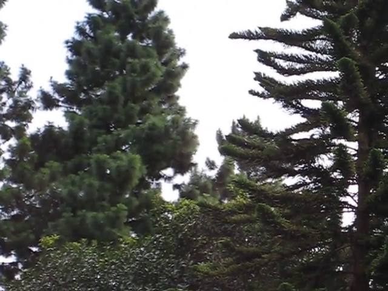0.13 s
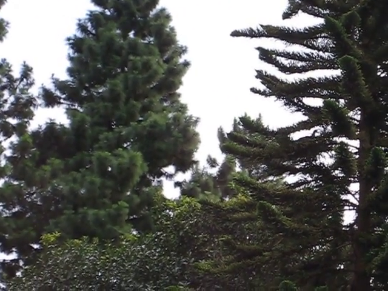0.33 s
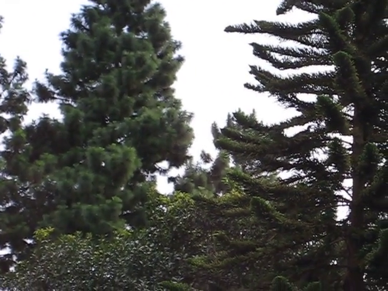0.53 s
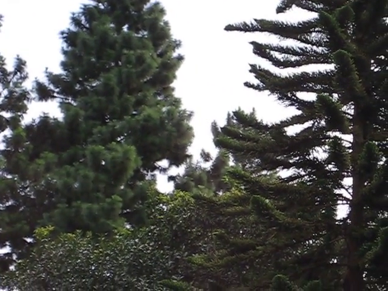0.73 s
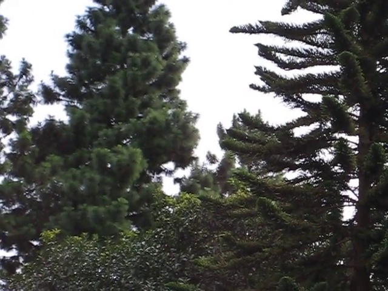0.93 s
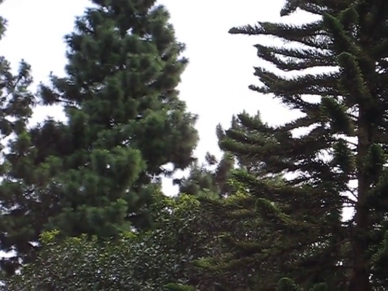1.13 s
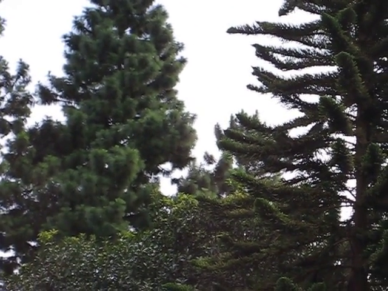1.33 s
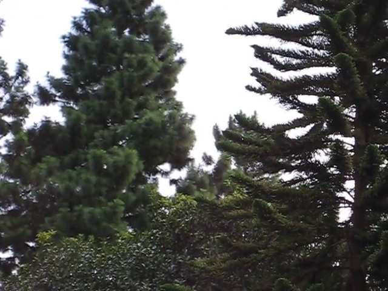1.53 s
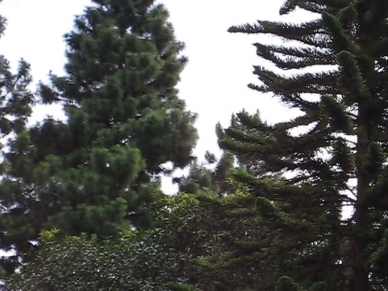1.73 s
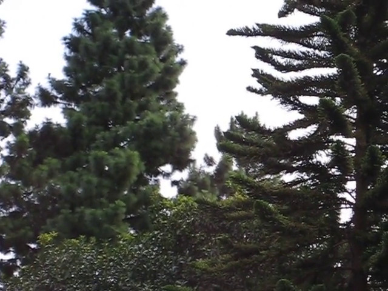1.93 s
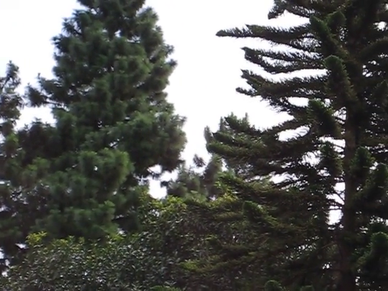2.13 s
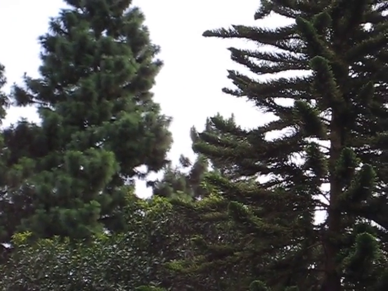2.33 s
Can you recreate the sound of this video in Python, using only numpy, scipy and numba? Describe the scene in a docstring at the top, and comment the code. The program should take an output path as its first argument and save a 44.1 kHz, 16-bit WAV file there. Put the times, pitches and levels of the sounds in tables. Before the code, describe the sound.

Three harsh upward bird calls ring out close by, with fainter chirps and whistles around them.

```python
"""Among tall trees at dawn, one microphone. First a far bird gives one rising call; then, close by, one
of its kind gives three loud calls that climb in pitch steps and collapse into a short creak. Small
birds whistle and rasp. Trunks and crowns scatter every voice over a distant hush of air and leaves.
Behind the microphone, the camera's gain control ducks the hush under the loud calls."""
import sys
import numpy as np
from scipy import signal
from scipy.fft import rfft, irfft
from scipy.io import wavfile
from scipy.ndimage import uniform_filter1d
from numba import njit

SR = 44100
rng = np.random.default_rng(int(sys.argv[2]) if len(sys.argv) > 2 else 0)


def store_wav(level_fs):
    """Save 16-bit WAV to argv[1]."""
    pcm = np.round(np.clip(np.atleast_2d(level_fs), -1, 1) * 32767)
    wavfile.write(sys.argv[1], SR, pcm.T.astype(np.int16))


N = 110250

# Three calls close to the microphone, one farther off. Each row: time in seconds, pitch in Hz,
# 2nd harmonic in dB, then the fundamental and the 4th harmonic (before the beak's lift) in dB over it.
NEAR_CALL_1 = [(0.21, 900, -46, -8, -10), (0.218, 1052, -44, 3.5, -8), (0.227, 1110, -33, 0.5, -19),
               (0.232, 1332, -22.5, -18, -40), (0.24, 1521, -23.5, 0, -38),
               (0.253, 1597, -14.5, -12.5, -33), (0.257, 1855, -23.5, -13, -22),
               (0.262, 1922, -31.5, 13.5, -7), (0.271, 1972, -27.5, 5.5, -8), (0.28, 2000, -18, -0.5, -8.5),
               (0.285, 2304, -32.5, 17, -15), (0.294, 2360, -28, 18, -7), (0.306, 2395, -21.5, 5, -14),
               (0.311, 2698, -21.5, 13, -8), (0.319, 2765, -24, 9.5, -12), (0.323, 2948, -22, 11.5, -9),
               (0.331, 3180, -30.5, 11.5, -12.5), (0.336, 3304, -23, 13, -13.5), (0.34, 2980, -26, 12, -18),
               (0.345, 2028, -27, 12, -16)]
NEAR_CALL_2 = [(1.752, 914, -42, -6, -15), (1.76, 1084, -40, 0.5, -11), (1.77, 1146, -30, -5.5, -17),
               (1.777, 1403, -14, -20.5, -30), (1.786, 1586, -18.5, -12, -35),
               (1.795, 1605, -15, -5.5, -18), (1.8035, 1653, -14, -24, -21), (1.8065, 1956, -21.5, 4.5, -8),
               (1.816, 1980, -16.5, 1, -8), (1.827, 2010, -29, -1, -7), (1.831, 2301, -27, 11.5, -10),
               (1.846, 2378, -23, 13, -7), (1.85, 2567, -19, 4, -21), (1.861, 2724, -18.5, 7.5, -16),
               (1.864, 2993, -14, 6, -18), (1.87, 2977, -37, 1, -16), (1.873, 3277, -30, 13.5, -20),
               (1.881, 3256, -28.5, 10.5, -24), (1.886, 2753, -22, 8, -22), (1.891, 1820, -18, 3, -2)]
NEAR_CALL_3 = [(2.034, 1103, -32.5, -2.5, -11), (2.045, 1272, -37, -17, -15),
               (2.056, 1418, -34.5, 0.5, -12), (2.066, 1490, -34, -6.5, -19),
               (2.076, 1576, -25, -2.5, -15.5), (2.088, 1624, -20, -4.5, -13.5),
               (2.099, 1702, -23.5, 0, -13), (2.108, 1752, -18, -17, -11.5), (2.12, 1792, -18, -5, -22),
               (2.131, 1835, -22.5, -12, -7.5), (2.138, 1843, -28, 7, -9.5),
               (2.1435, 2016, -15.5, -19, -34), (2.1455, 2577, -27, 15, -12.5),
               (2.157, 2592, -30.5, 7.5, -19), (2.168, 2563, -27, 16, -20), (2.172, 2740, -25, 19, -14)]
FAR_CALL = [(0, 2003, -60, 18, -26), (.016, 2150, -60, 16, -21), (.02, 2320, -58, 13, -20),
            (.038, 2510, -55, 12, -28.5), (.042, 2820, -55, 13.4, -27.5), (.062, 2835, -53, 11, -35),
            (.076, 3250, -58, 11, -25)]
# Creaks ending the near calls. Each row: start and length in seconds, first pulse rate in Hz, level in dB.
CREAKS = [(0.345, 0.014, 1886, -17), (1.891, 0.014, 1620, -17.5), (2.173, 0.0159, 1518, -21.5)]
# The near bird's throat resonances. Each row: centre in Hz, width in Hz, relative level in dB.
THROAT_RESONANCES = [(920, 1900, -17), (2656, 1620, -1.5), (5660, 4000, -14.5), (9000, 7000, -33)]
# Small whistlers. Each row: start and length in seconds, first, middle and last pitch in Hz,
# level in dB, flutter in dB.
WHISTLES = [(.10, 0.088, 9400, 9440, 9100, -58, 2), (0.193, 0.081, 9130, 8720, 8500, -50.5, 1),
            (.435, .085, 7530, 7520, 7500, -47.5, 1), (.429, .027, 4950, 5150, 5300, -31, 2.5),
            (.545, 0.0175, 2110, 2470, 2994, -46, 1.5), (0.561, 0.021, 3000, 3370, 3550, -35, 2),
            (.532, 0.02, 3227, 3600, 4370, -45, 0.5), (.578, .018, 9400, 8300, 7400, -51, 1),
            (.619, .022, 9100, 8300, 6600, -48, 1), (1.972, .06, 4850, 4750, 4710, -45, 0),
            (.78, 0.04, 5450, 5380, 5300, -45, 1.5), (.793, .022, 4150, 4300, 4400, -47, 1),
            (.815, .075, 4400, 4270, 4200, -44, 1), (.82, .04, 3850, 3350, 3290, -39, 1.5),
            (.838, 0.045, 2270, 2130, 2200, -45, 1.5), (.832, .02, 5200, 5050, 4900, -49, 1),
            (.866, .012, 2500, 3300, 3600, -45, 1), (.879, .028, 3450, 2300, 1600, -37, .5),
            (.826, .03, 4100, 3800, 3600, -49, 1), (.842, 0.018, 7600, 8000, 8250, -52, 1.5),
            (.86, 0.065, 8100, 6950, 6350, -49, 1.5), (.905, .045, 5200, 5050, 4800, -48, 1.5),
            (.95, .085, 4750, 4680, 4620, -46, 1), (1.035, 0.15, 4600, 4490, 4500, -48.5, 2),
            (1.02, .155, 4480, 4260, 4240, -49, 1.5), (.952, 0.021, 5770, 5700, 5450, -53, 1),
            (1.107, 0.009, 5200, 6300, 7700, -53, 1), (1.342, 0.018, 5000, 5900, 6450, -50, 1),
            (1.36, .018, 4500, 5500, 6900, -52, 1.5), (1.34, 0.05, 9729, 9500, 9450, -56, 2),
            (1.432, 0.007, 7350, 5960, 4585, -50, 1), (1.472, 0.024, 7600, 6400, 5800, -53, 1),
            (1.497, .012, 6100, 5300, 4600, -50, 1), (1.463, .045, 7800, 7600, 7500, -55, 1.5),
            (2.29, .13, 3680, 3500, 3720, -49, 2), (2.416, .03, 3720, 3900, 4220, -51, 2),
            (2.442, .065, 4210, 4190, 4180, -49, 2), (2.4, 0.1, 6000, 5100, 4850, -55, 2)]
# Raspy chirps. Each row: start and fade time in seconds, centre and width in Hz, level in dB.
CHIRPS = [(.43, 0.059, 4770, 500, -32), (.42, 0.05, 8550, 2510, -38), (0.552, 0.023, 5070, 500, -37.5),
          (0.666, 0.045, 6700, 5000, -44.5), (0.721, 0.058, 6270, 6700, -39.5),
          (.83, 0.11, 3030, 2550, -37.5), (1.105, 0.029, 9000, 3960, -52)]
# Scatter from the trees. Each row: delay in seconds, relative level in dB.
TREE_ECHOES = [(.004, -8), (.012, -13), (.04, -18), (.1, -22), (.16, -27.5), (.3, -40), (.7, -52)]
# The distant hush. Each row: frequency in Hz, relative spectral density in dB.
HUSH_SPECTRUM = [(12, -32), (20, -9.5), (237, -6.5), (415, -7.5), (1110, -10), (2050, -12.5), (4300, -13.5),
                 (8000, -17.5), (11000, -20), (12700, -25.5), (14600, -16), (16400, -28.5)]
# Thin steady whines. Each row: pitch in Hz, level in dB.
WHINES = [(7558, -62.5), (15149, -76)]
# A brief low swell of the hush. Each row: start and fade time in seconds, centre and width in Hz,
# level in dB.
HUSH_SWELL = [(.36, 0.16, 342, 560, -47.5)]

WAVER_SHARE = 0.0026  # unsteadiness of pitch in calls and whistles


def undb(db):
    return 10 ** (np.asarray(db) / 20)


def walk(rate, size):
    """Smooth random drift that turns about rate times a second, spread near 1."""
    hold = max(int(SR / rate), 1)
    steps = np.repeat(rng.standard_normal(size // hold + 1), hold)
    return 1.62 * uniform_filter1d(uniform_filter1d(steps, hold), hold)[:size]


def span(start, length):
    """First sample and local times of an event."""
    return max(int(start * SR), 0), np.arange(max(int(length * SR), 8)) / SR


def edges(t, fade_s):
    return np.clip(np.minimum(t, t[-1] - t) / fade_s, 0, 1)


def add(out, i, x):
    out[i:i + len(x)] += x[:N - i]


def resonate(x, hz, width):
    """Two like resonances in series."""
    b, a = signal.iirpeak(hz, hz / width, SR)
    return signal.lfilter(b, a, signal.lfilter(b, a, x))


def call(rows, beak_hz=3030, beak_width_hz=450, beak_db=8.5):
    """A bird's harmonic voice steps upward; the beak lifts upper harmonics passing its resonance."""
    out, rows = np.zeros(N), np.array(rows, float)
    start = rows[0, 0]
    i, t = span(start, rows[-1, 0] - start)
    hz, db, first_db, fourth_db = (np.interp(t + start, rows[:, 0], column) for column in rows.T[1:])
    phase = 2 * np.pi * np.cumsum(hz * (1 + WAVER_SHARE * walk(238.4, len(t)))) / SR
    for k in range(1, 13):
        lift_db = (k > 2) * beak_db * np.exp(-((k * hz - beak_hz) / beak_width_hz) ** 2)
        harmonic_db = first_db if k == 1 else fourth_db * ((k - 2) / 2) ** 0.83 + lift_db
        grain_db = .8 * min(k - .5, 4) * (hz / 2200) ** 2 * walk(1200, len(t))  # rougher when higher
        top_fade = np.clip((SR / 2.5 - k * hz) / 1000, 0, 1)
        gain = undb(db + harmonic_db + grain_db) * top_fade * edges(t, fade_s=.002)
        add(out, i, np.sqrt(2) * gain * np.sin(k * phase + 2 * np.pi * rng.random()))
    return out


def creaks(end_hz=560, slowing_s=0.003, scatter_db=2.5, fade_s=0.012):
    """The near bird's voice slackens: slowing, uneven pulses ring the throat."""
    out = np.zeros(N)
    for start, length, hz, db in CREAKS:
        i, t = span(start, length)
        cycles = np.cumsum(end_hz + (hz - end_hz) * np.exp(-t / slowing_s)) / SR
        strength = undb(scatter_db * rng.standard_normal(100))[cycles.astype(int)]
        pulses = np.diff(np.floor(cycles), prepend=-1) * strength * np.exp(-t / fade_s)
        pulses = np.r_[pulses, np.zeros(400)]  # time to ring out
        ring = sum((-1) ** k * undb(peak_db) * resonate(pulses, centre, width)
                   for k, (centre, width, peak_db) in enumerate(THROAT_RESONANCES))
        add(out, i, ring * undb(db) / ring[:len(t)].std())
    return out


def whistles(flutter_per_s=119):
    """Small birds whistle almost pure tones that bend through three pitches and flutter in level."""
    out = np.zeros(N)
    for start, length, *pitches, db, flutter_db in WHISTLES:
        i, t = span(start, length)
        bend_hz = np.polyval(np.polyfit([0, .5, 1], pitches, 2), t / length)
        hz = bend_hz * (1 + WAVER_SHARE * walk(flutter_per_s, len(t)))
        flutter = walk(flutter_per_s, len(t)) + 1.1 * walk(600, len(t))
        gain = undb(db + flutter_db * flutter) * edges(t, 0.04 * length)
        add(out, i, np.sqrt(2) * gain * np.sin(2 * np.pi * np.cumsum(hz) / SR))
    return out


def two_voiced_note(upper_db=-30, lower_db=-41, decay_s=.075):
    """Both sides of one bird's voice box glide down; faint overtones and their sum tone follow."""
    def glide(from_hz, to_hz, glide_s):
        return 2 * np.pi * np.cumsum(to_hz + (from_hz - to_hz) * np.exp(-t / glide_s)) / SR

    out = np.zeros(N)
    i, t = span(start=1.134, length=0.148)
    upper, lower = glide(8800, 6070, .04), glide(7550, 5250, .062)
    overtones = undb(-22) * t / decay_s * (np.sin(2 * upper) + np.sin(upper + lower) + np.sin(2 * lower))
    voices = undb(upper_db) * (np.sin(upper) + overtones) + undb(lower_db) * np.sin(lower)
    envelope = edges(t, fade_s=.025) * np.exp(-t / decay_s)
    grain = undb(1.3 * walk(600, len(t)))
    add(out, i, np.sqrt(2) * voices * envelope * grain)
    return out


def rasps(rows):
    """Grainy bursts of noise, quick to start, then fading: chirps when high, a soft swell when low."""
    out = np.zeros(N)
    for start, fade_s, hz, width, db in rows:
        i, t = span(start, 2 * fade_s)
        grainy_noise = rng.standard_normal(len(t)) * undb(walk(460, len(t)))
        burst = resonate(grainy_noise, hz, width)
        envelope = edges(t, 0.073 * fade_s) * np.exp(-(t / fade_s) ** 3)
        add(out, i, burst / burst.std() * undb(db) * envelope)
    return out


def air(x, from_hz=9500, db_per_khz=-3):
    """The air dulls the top on the way to the microphone."""
    hz = np.arange(N // 2 + 1) * SR / N
    return irfft(rfft(x) * undb(db_per_khz * np.maximum(hz - from_hz, 0) / 1000), N)


def trees(x, low_cut_hz=1080, treble_hz=5000, treble_db=8):
    """Dense weak echoes off trunks and crowns; treble dies sooner, and moving leaves add a shimmer."""
    delays, levels_db = np.array(TREE_ECHOES).T
    t = np.arange(int(delays[-1] * SR)) / SR
    envelope = undb(np.interp(t, delays, levels_db)) * (t > delays[0])
    echo = rng.standard_normal(len(t)) * envelope / np.sqrt(SR / 100)
    echo = signal.sosfilt(signal.butter(2, low_cut_hz, "high", fs=SR, output="sos"), echo)
    body = signal.sosfilt(signal.butter(1, treble_hz, fs=SR, output="sos"), echo)
    treble = (echo - body) * undb(treble_db - 60 * t / 0.47)  # loses a further 60 dB in 0.47 s
    shimmer = undb(.8 * walk(600, N))
    return signal.fftconvolve(x, body + treble)[:N] * shimmer


def hush(level_db=-45.5, flicker_db=.8):
    """Distant air and leaves, each octave flickering a little."""
    hz = np.maximum(np.arange(N // 2 + 1) * SR / N, 1)
    points_hz, points_db = np.array(HUSH_SPECTRUM).T
    spectrum = rfft(rng.standard_normal(N)) * undb(np.interp(np.log(hz), np.log(points_hz), points_db))
    octave = np.clip(np.log2(hz / 20).astype(int), 0, 9)
    noise = sum(irfft(spectrum * (octave == k), N) * undb(flicker_db * walk(5.95, N)) for k in range(10))
    return noise / noise.std() * undb(level_db)


def whines(flicker_db=2):
    """Two thin tones in the background, steady in pitch and flickering in level."""
    t = np.arange(N) / SR
    return sum(np.sqrt(2) * undb(db + flicker_db * walk(24.2, N)) * np.sin(2 * np.pi * hz * t)
               for hz, db in WHINES)


def scene():
    """At the microphone: the near bird mostly direct, the far one mostly by way of the trees."""
    near = air(call(NEAR_CALL_1) + call(NEAR_CALL_2) + call(NEAR_CALL_3) + creaks())
    far = call(FAR_CALL)
    small_birds = whistles() + two_voiced_note() + rasps(CHIRPS)
    echoes = trees(near + undb(13.5) * far + undb(-3) * small_birds)
    background = hush() + whines() + rasps(HUSH_SWELL)
    return (near + far + small_birds + echoes + background)[None]


@njit
def follow_level(x, attack_s, release_s):
    """The level that the gain control senses, rising and falling at separate speeds."""
    level, levels = 0., np.empty(len(x))
    for i in range(len(x)):
        lag_s = attack_s if abs(x[i]) > level else release_s
        level += (abs(x[i]) - level) / (lag_s * SR)
        levels[i] = level
    return levels


def record(dry):
    """The camera turns its microphone down above a threshold and cuts the very top."""
    threshold, ratio, top_hz = undb(-17), 3.13, 16500
    level = follow_level(dry[0], attack_s=0.012, release_s=0.038)
    gain = (threshold / np.maximum(level, threshold)) ** (1 - 1 / ratio)
    return signal.sosfilt(signal.ellip(10, .2, 70, top_hz, fs=SR, output="sos"), dry * gain)


dry = scene()
out = record(dry)
store_wav(out)
```